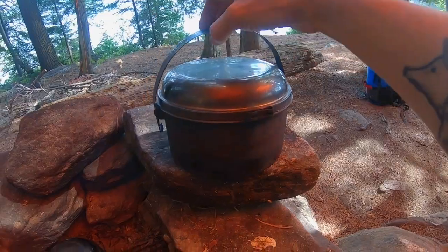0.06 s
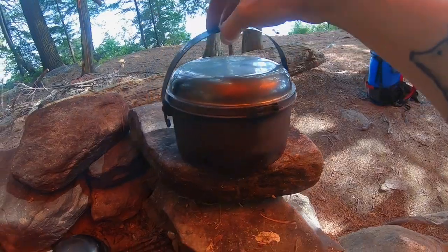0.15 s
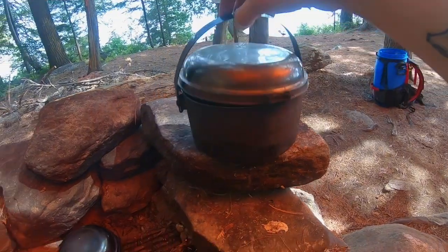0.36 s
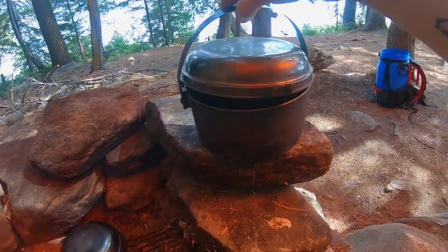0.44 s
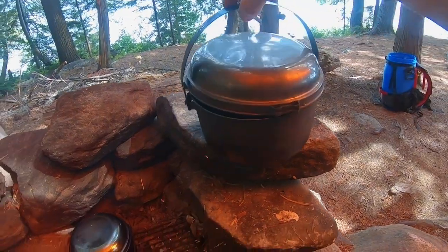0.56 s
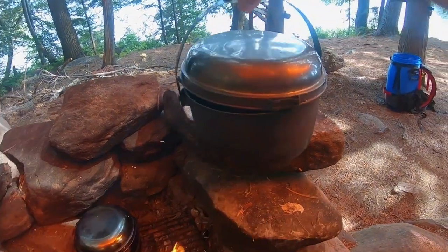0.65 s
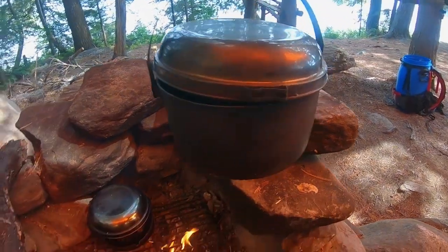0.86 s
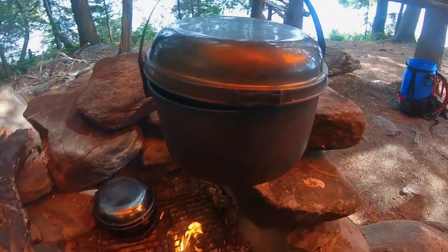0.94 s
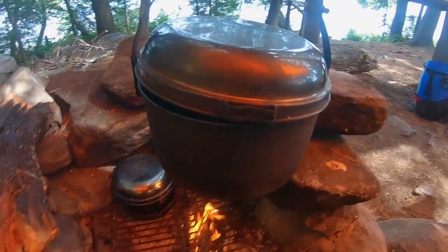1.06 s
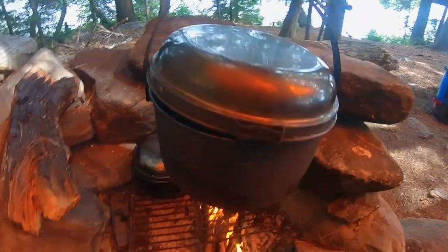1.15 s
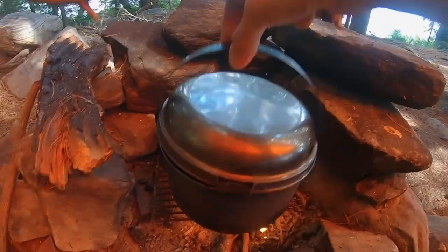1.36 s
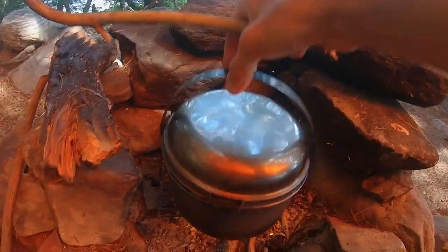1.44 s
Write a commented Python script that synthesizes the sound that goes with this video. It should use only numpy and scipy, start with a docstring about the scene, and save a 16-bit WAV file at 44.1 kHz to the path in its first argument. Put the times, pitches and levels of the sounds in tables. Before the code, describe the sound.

A metal cooking pot's lid rattles and clanks once as it is lifted beside a crackling campfire

```python
"""A lidded metal pot is lifted by its handle outdoors: the lid rattles and clanks on the rim (touches and
blows ringing tuned modes, plus scratch noise), soft knocks ring the body, the handle squeaks and taps.
Beside it a small wood fire hisses and snaps: noise bursts, each with an echo and a diffuse tail.
Wind buffets the right microphone port as short low swings, over lumpy low noise and a faint hum."""
import sys
import numpy as np
from scipy import signal
from scipy.fft import rfft, irfft
from scipy.io import wavfile

SR = 44100
rng = np.random.default_rng(int(sys.argv[2]) if len(sys.argv) > 2 else 0)


def wrap_up_sound(samples):
    """Save the sound to the file named by the first command line argument, as 16-bit audio."""
    columns = np.atleast_2d(samples).T
    # keep every value between -1 and 1, then stretch to whole-number steps
    tamed = np.clip(columns, -1, 1)
    steps = np.round(tamed * 32767).astype(np.int16)
    wavfile.write(sys.argv[1], SR, steps)


N = 68355  # length in samples

# Fire hiss spectrum: f/Hz, level/dB (per Hz)
HISS_COLOUR = [(120, -4.5), (200, 0), (400, -14), (1300, -22.5), (4500, -27), (8000, -33.5), (10000, -48),
               (16000, -51.5)]
# Low wind noise spectrum: f/Hz, level/dB (per Hz)
WIND_COLOUR = [(12, -20), (20, 10), (81, 1), (97, -14.5), (127, -3.5), (168, -6), (300, -32.5), (400, -58)]
# Wind buffets: centre t/s, nominal length/s (swells last 1.19 times this), f/Hz, level/dB
WIND_BUFFETS = [(0.024, 0.067, 89.4, -29), (0.434, 0.14, 76.8, -15.5), (0.506, 0.032, 58.6, -23),
                (0.668, 0.045, 93, -29.5), (0.759, 0.054, 111.1, -22), (0.79, 0.048, 116.5, -19),
                (0.856, 0.098, 90.8, -27), (0.9, 0.1, 70.5, -28), (0.989, 0.057, 99.1, -21),
                (1.125, 0.037, 81.7, -21), (1.209, 0.043, 83, -32.5), (1.415, 0.023, 59.9, -31)]
# Fire snaps: t/s, level/dB, body/dB (relative), treble/dB (relative)
FIRE_SNAPS = [(.232, -15, 1.5, 0), (0.2612, -21.5, -7.5, 1.5), (1.1766, -28.5, 6.5, -8),
              (1.2496, -16.5, 2, -1.5), (1.307, -21, -1, 1)]
# Spectrum of the snap bursts: f/Hz, level/dB (per Hz)
SNAP_SPECTRUM = [(88, -31), (150, 2), (300, -2.5), (600, -14), (1480, -15), (4300, -2.5), (6910, -1.5),
                 (8900, -11), (13700, -26), (16000, -27)]
# Spectrum of the snap tails: f/Hz, level/dB (per Hz)
TAIL_SPECTRUM = [(350, -29), (600, -2), (1550, -15), (5120, -6.5), (7210, 2.5), (14500, -37.5),
                 (16000, -49.5)]
# Handle taps on its lug: t/s, level/dB
HANDLE_TAPS = [(1.384, -63.5), (1.4, -66.5), (1.432, -69.5), (1.497, -72)]
# Handle modes: f/Hz, level/dB, t60/s
HANDLE_MODES = [(1225, -12, .07), (2134, -13, 0.045), (3400, -7, 0.045)]
# Soft knocks of the lid on the rim: t/s, level/dB, lower modes/dB (relative)
LID_KNOCKS = [(0.072, -44, -13), (0.346, -28, -8.5), (0.396, -20, -5.5), (0.416, -14.5, -1.5),
              (0.435, -23, -15), (0.468, -16, -2.5), (0.519, -24, -0.5), (0.573, -36.5, 2.5),
              (0.732, -53, 6), (0.834, -54.5, 0), (0.875, -46.5, 3), (1.165, -48, 2), (1.186, -48, 1.5),
              (1.26, -46, 5.5), (1.295, -35, -2.5), (1.392, -42.5, 1), (1.435, -41.5, -2.5),
              (1.498, -40, -2.5)]
# Pot body modes: f/Hz, level/dB, t60/s
BODY_MODES = [(289, 1, 0.053), (355, -5.5, 0.07), (401.6, -0.5, 0.09), (437.5, -1.5, 0.21), (609, 2, 0.098)]
# Clanks, where the lid strikes and rings: t/s, level/dB
LID_CLANKS = [(.396, -30), (.44, -23), (.52, -34.5)]
# Lid mode pitches: f/Hz
LID_PITCHES = [904, 1066, 1408, 1587, 1642, 1793, 2139, 2304, 2476, 2549, 2665, 2972, 3095, 3537, 4287,
               2902, 852, 1157, 2040, 3750, 3042]
# The same lid modes, in order: level/dB, t60/s
LID_RINGS = [(-10, 0.28), (-16.5, 0.37), (-6.5, 0.573), (-22, 0.82), (-13, 1.07), (-19, 0.64), (-20, .6),
             (-19, 0.52), (-20, 0.6), (-13.5, 0.5), (-11.5, 0.46), (-20, .6), (-18, 0.694), (-19, 0.52),
             (-12.5, 0.22), (-19.5, 0.508), (-17.5, 0.53), (-20.5, 0.46), (-17, 0.334), (-18, 0.41),
             (-24, 0.94)]
# Rim mode pitches: f/Hz
RIM_PITCHES = [1197, 1236, 2880, 3388, 3478, 4390, 5450, 6690, 7206, 7905]
# The same rim modes, in order: level/dB
RIM_LEVELS = [-5, -6, -2.5, -3.5, -2.5, -1.5, -5, -1, -2.5, -5]
# Lid rattles: t/s, level/dB, treble/dB (relative), t60/s
LID_RATTLES = [(0.337, -30, -6, 0.28), (0.3424, -28, 10.5, 0.04), (.372, -32, 0, 0.17),
               (.392, -24.5, 13.5, 0.089), (.401, -26.5, 4.5, 0.23), (0.431, -18, -5.5, 0.12),
               (0.446, -23, -7, 0.089), (0.471, -28, -14, 0.094), (.513, -38, -4.5, 0.15),
               (.558, -34.5, -4, 0.063)]
# Scratch spectrum, also used for the rustle: f/Hz, level/dB (per Hz)
SCRATCH_COLOUR = [(320, -45.5), (550, -6.5), (981, -8.5), (1210, -4), (2320, -7.5), (3390, -0.5),
                  (3850, -7.5), (6580, -7.5), (9360, -23.5), (13900, -35), (16000, -39)]

# Pans are left minus right, in dB
AIR_DB = -56
RUSTLE_S, RUSTLE_LENGTH_S, RUSTLE_DB = 0.069, 0.16, -54.5
WIND_DB, WIND_LUMPS_DB, WIND_PAN_DB = -42, 3, -3
BUFFET_LEAK_DB = -20  # buffets in the left port, relative to the right
HUM_S, HUM_LENGTH_S, HUM_HZ, HUM_DB = .2, .7, 182, -45
HUM_T60_S = 2.5 / 28
SNAP_RISE_S, SNAP_HOLD_S, SNAP_T60_S = 0.00089, 0.0016, 0.009  # hold is counted from the onset
ECHO_S, ECHO_DB, TAIL_DB, TAIL_T60_S, SNAP_PAN_DB = 0.00773, -17, -14.5, 0.13, 2
TAP_T60_S = 0.052
SQUEAK_S, SQUEAK_SWELL_S, SQUEAK_HZ, SQUEAK_DB = .358, .036, 1730, -26.5
BODY_PAN_DB, CONTACT_HZ = 6.5, 471  # upper edge of the soft contact
LID_PAN_DB = -3.5
TOUCHES_PER_S = 2500  # average rate of chance touches
RATTLE_RISE_S, RIM_T60_S = 0.0024, 0.04
RIM_DB, SCRATCH_DB, RATTLE_PAN_DB = -26, 1, 1.5
TREBLE_SPLIT_HZ = 5000
PORT_LAG_S, CUTOFF_HZ = .000025, 16500


def from_db(db):
    """Amplitude factor of a level in dB."""
    return 10 ** (np.asarray(db) / 20)


def rms_one(x):
    """Scale to an overall rms of 1."""
    return x / np.sqrt(np.mean(x ** 2) + 1e-20)


def pan(db):
    """Left and right gains whose ratio is db; positive leans left."""
    return from_db(np.array([[db / 2], [-db / 2]]))


def coloured(x, points):
    """Minimum-phase filter following the spectrum; white noise of rms 1 keeps rms 1."""
    hz, db = np.transpose(points)
    grid = np.linspace(0, SR / 2, 2049)
    level_db = np.interp(np.log(grid + 1), np.log(hz), db, left=db[0] - 20)
    # Folding the cepstrum of the log gain makes the phase minimal
    cepstrum = irfft(level_db * np.log(10) / 20)
    cepstrum[1:2048] *= 2
    cepstrum[2049:] = 0
    taps = irfft(np.exp(rfft(cepstrum)))
    taps = taps / np.linalg.norm(taps)
    taps = np.reshape(taps, (1,) * (x.ndim - 1) + (-1,))
    return signal.fftconvolve(x, taps, axes=-1)[..., :N]


def filtered(x, order, hz, kind="low"):
    """Butterworth filter."""
    return signal.sosfilt(signal.butter(order, hz, kind, fs=SR, output="sos"), x)


def drift(rate):
    """Slow random wander of spread 1, one per channel: noise through two equal low-pass poles."""
    r = np.exp(-2 * np.pi * rate / SR)
    wander = signal.lfilter([1], [1, -2 * r, r * r], rng.standard_normal((2, N + SR)))
    return rms_one(wander[:, SR:])  # skip the settling second


def ring(drive, hz, t60):
    """One mode: a two-pole resonator whose free ringing falls 60 dB in t60 seconds."""
    r, w = from_db(-60 / (t60 * SR)), 2 * np.pi * hz / SR
    return signal.lfilter([0, np.sin(w)], [1, -2 * r * np.cos(w), r * r], drive + 1e-18)


def dying(t, t60):
    """Exponential decay starting at t = 0, silent before."""
    return (t >= 0) * from_db(-60 * np.maximum(t, 0) / t60)


def bump(centre, length):
    """Smooth raised-cosine swell of the given full length in seconds."""
    return np.cos(np.pi * np.clip((np.arange(N) / SR - centre) / length, -.5, .5)) ** 2


def stereo_noise(alike):
    """Left and right noise sharing the given part of their power."""
    a = np.clip(alike, 0, 1)
    shared = rng.standard_normal(N)
    return np.sqrt(a) * shared + np.sqrt(1 - a) * rng.standard_normal((2, N))


def air():
    """Wide, gently wavering hiss of the fire, and a brief rustle as the pot brushes the stone."""
    hiss = coloured(stereo_noise(0.032), HISS_COLOUR) * from_db(AIR_DB + 0.5 * drift(13.3))
    brush = coloured(stereo_noise(0.68), SCRATCH_COLOUR)
    return hiss + from_db(RUSTLE_DB) * bump(RUSTLE_S, RUSTLE_LENGTH_S) * brush


def wind():
    """Buffets swing low tones mostly in the right port, over lumpy low noise and a swelling hum."""
    t = np.arange(N) / SR
    swings = np.zeros(N)
    for s, length, hz, db in WIND_BUFFETS:
        swings += from_db(db) * bump(s, length * 1.19) * np.sin(2 * np.pi * hz * (t - s))
    lumps_db = WIND_DB + WIND_LUMPS_DB * drift(7.9)
    lumps = coloured(rng.standard_normal((2, N)), WIND_COLOUR) * from_db(lumps_db)
    hum = rms_one(ring(stereo_noise(0.25), HUM_HZ, HUM_T60_S))
    hum = hum * from_db(HUM_DB) * bump(HUM_S, HUM_LENGTH_S) * pan(4.0)
    return swings * from_db([[BUFFET_LEAK_DB], [0]]) + lumps * pan(WIND_PAN_DB) + hum


def snap_shape(t):
    """Fast rise, short hold and steep decay of one crack."""
    return np.clip(t / SNAP_RISE_S, 0, 1) * dying(np.maximum(t - SNAP_HOLD_S, 0), SNAP_T60_S)


def snaps():
    """Each snap is a burst of a few ms, one echo off the stones and a wide tail, with its own tone."""
    out = np.zeros((2, N))
    burst = stereo_noise(0.95)
    tail = coloured(stereo_noise(0.12), TAIL_SPECTRUM)
    for s, db, body_db, treble_db in FIRE_SNAPS:
        t = np.arange(N) / SR - s
        envelope = snap_shape(t) + from_db(ECHO_DB) * snap_shape(t - ECHO_S)
        crack = coloured(burst * envelope, SNAP_SPECTRUM)
        late = tail * from_db(TAIL_DB) * dying(t, TAIL_T60_S)
        tone = [(20, 0), (1200, 0.0067), (3000, body_db), (6500, 0), (10000, treble_db)]
        out += from_db(db) * coloured(crack + late, tone)
    return out * pan(SNAP_PAN_DB)


def handle():
    """Soft noisy taps ring the handle and thud; once it slips in its lug with a swelling tone."""
    t = np.arange(N) / SR
    taps = sum(from_db(db) * dying(t - s, TAP_T60_S) for s, db in HANDLE_TAPS)
    rings = np.zeros(N)
    for hz, db, t60 in HANDLE_MODES:
        rings += from_db(db) * ring(taps * rng.standard_normal(N), hz, t60)
    thud = filtered(taps * rng.standard_normal(N), 4, 4000)
    t = t - SQUEAK_S
    swell = np.clip(t / SQUEAK_SWELL_S, 0, 1) * dying(np.maximum(t - SQUEAK_SWELL_S, 0), .02)
    squeak = from_db(SQUEAK_DB) * swell * np.sin(2 * np.pi * SQUEAK_HZ * t)
    return rings + from_db(16.5) * thud + squeak


def knocks():
    """Soft contacts, clicks narrowed to a low band, ring the modes of the pot body."""
    s, db, low_db = np.transpose(LID_KNOCKS)
    soft = np.zeros((2, N))  # drives of the lower and of the upper modes
    soft[:, (s * SR).astype(int)] = from_db([db + low_db, db])
    soft = filtered(soft, 2, [350, CONTACT_HZ], "band")
    body = sum(from_db(d) * ring(soft[int(hz > 420)], hz, t60) for hz, d, t60 in BODY_MODES)
    return body * pan(BODY_PAN_DB)


def clanks():
    """Single blows, slightly dulled, set all the lid modes ringing."""
    blows = np.zeros(N)
    for s, db in LID_CLANKS:
        blows[int(s * SR)] = from_db(db)
    blows = filtered(blows, 2, 5000)
    lid = sum(from_db(db) * ring(blows, hz, t60) for hz, (db, t60) in zip(LID_PITCHES, LID_RINGS))
    return lid * pan(LID_PAN_DB)


def chance_touches(born):
    """Touches at the given moments with random size and sign, at rms 1."""
    sizes = from_db(3.9 * np.minimum(rng.exponential(1, N), 4)) * rng.choice([-1, 1], N)
    return rms_one(born * sizes)


def rattles():
    """Dying runs of chance touches of the lid ring the rim and scratch it; treble has its own level."""
    t = np.arange(N) / SR
    level, treble = np.zeros(N), np.zeros(N)
    for s, db, treble_db, t60 in LID_RATTLES:
        run = np.clip((t - s) / RATTLE_RISE_S, 0, 1) * dying(t - s, t60)
        level += from_db(db) * run
        treble += from_db(db + treble_db) * run
    born = rng.random(N) < TOUCHES_PER_S / SR
    out = np.zeros((2, N))
    for hz, db in zip(RIM_PITCHES, RIM_LEVELS):
        is_high = hz > TREBLE_SPLIT_HZ
        touches = (treble if is_high else level) * chance_touches(born)
        side = pan(RATTLE_PAN_DB + (4 if is_high else 0))
        out += from_db(db + RIM_DB) * ring(touches, hz, RIM_T60_S) * side
    grains = chance_touches(born) * .5 + 0.34 * rng.standard_normal((2, N))
    scratch = coloured(grains, SCRATCH_COLOUR)
    high = filtered(scratch, 4, TREBLE_SPLIT_HZ, "high")
    low = filtered(scratch, 4, TREBLE_SPLIT_HZ)
    scratch = low * level + high * treble * pan(3.4)
    return out + from_db(SCRATCH_DB) * scratch * pan(RATTLE_PAN_DB)


def pot():
    """The lid works against the pot three ways: body knocks, ringing clanks and rattles."""
    return knocks() + clanks() + rattles()


def scene():
    """Layer everything from the background to the pot."""
    return air() + wind() + snaps() + handle() + pot()


def record(dry):
    """Sound reaches the right port slightly later, by a phase slope; the top is cut steeply."""
    lag = np.exp(-2j * np.pi * np.fft.rfftfreq(N, 1 / SR) * [[0], [PORT_LAG_S]])
    lagged = irfft(rfft(dry) * lag, N)
    return signal.sosfilt(signal.cheby2(12, 70, CUTOFF_HZ, fs=SR, output="sos"), lagged)


dry = scene()
out = record(dry)
wrap_up_sound(out)
```